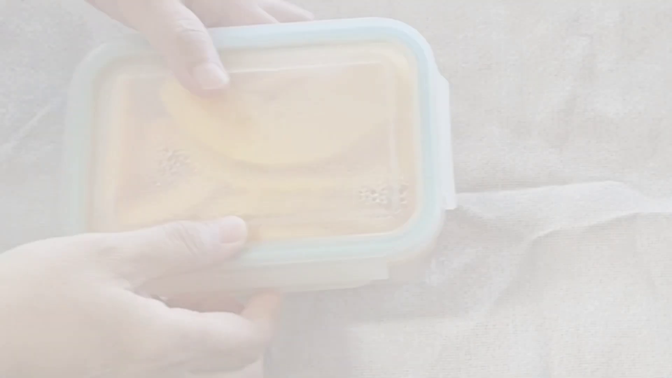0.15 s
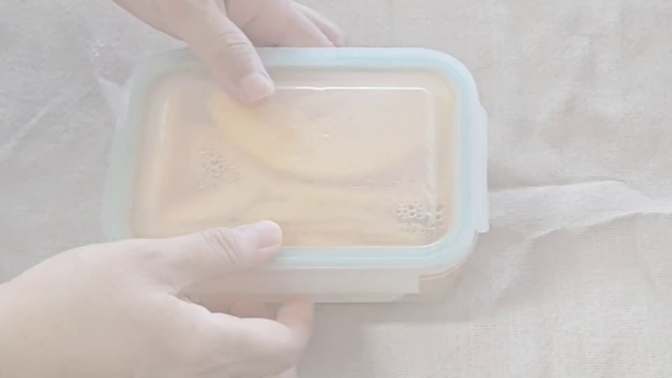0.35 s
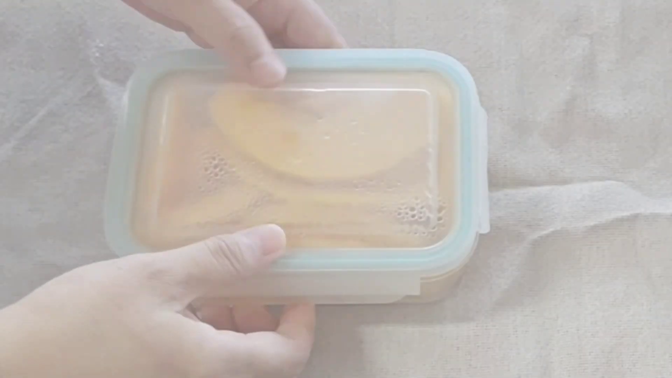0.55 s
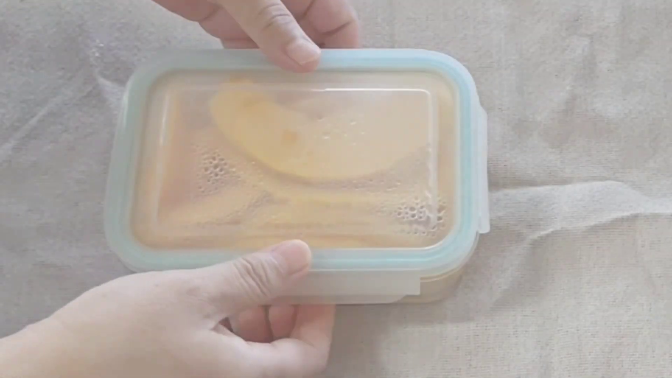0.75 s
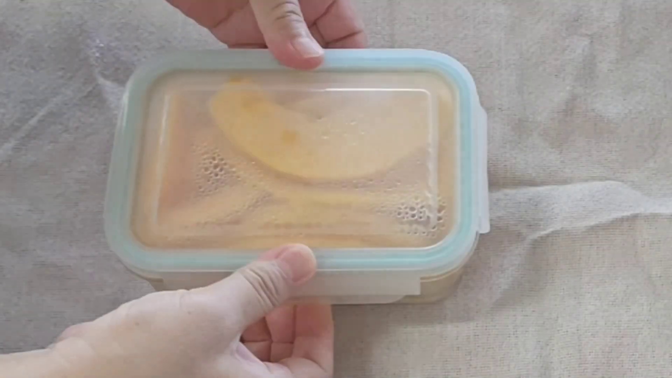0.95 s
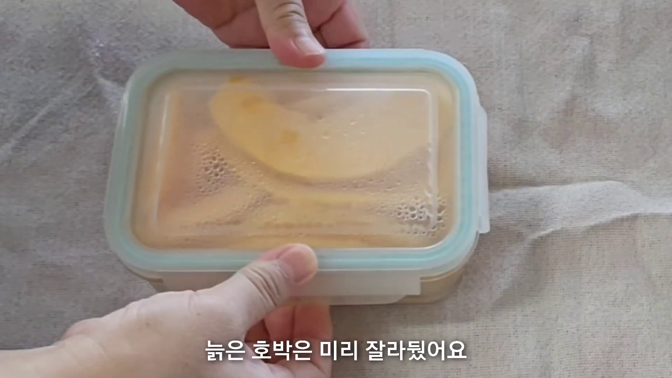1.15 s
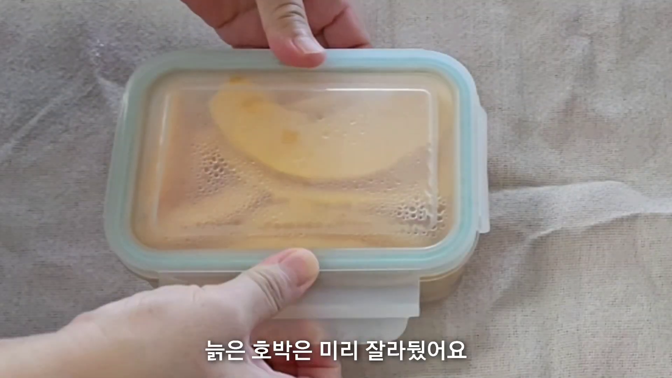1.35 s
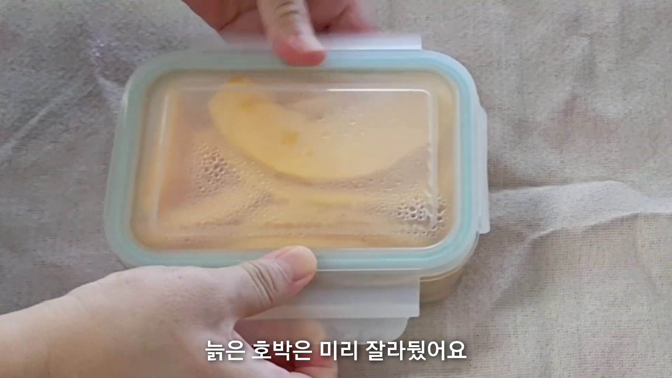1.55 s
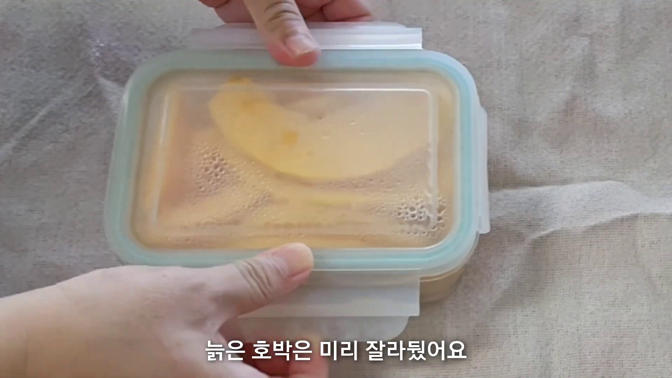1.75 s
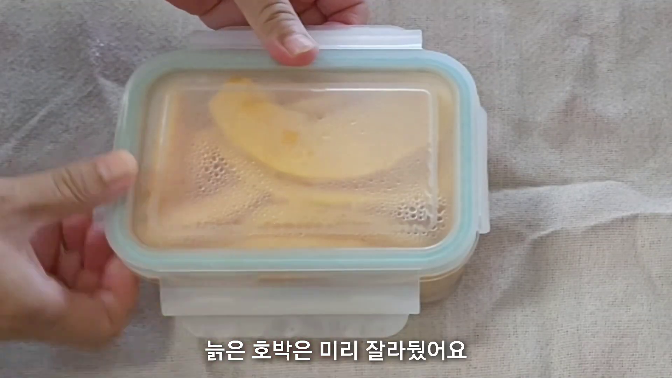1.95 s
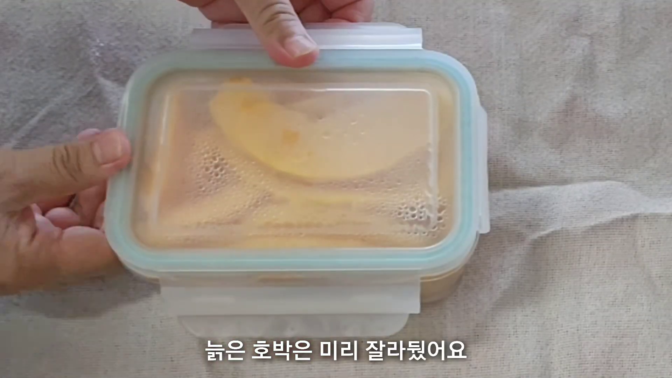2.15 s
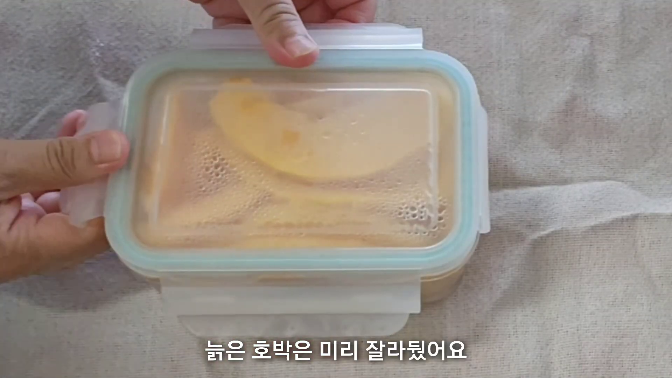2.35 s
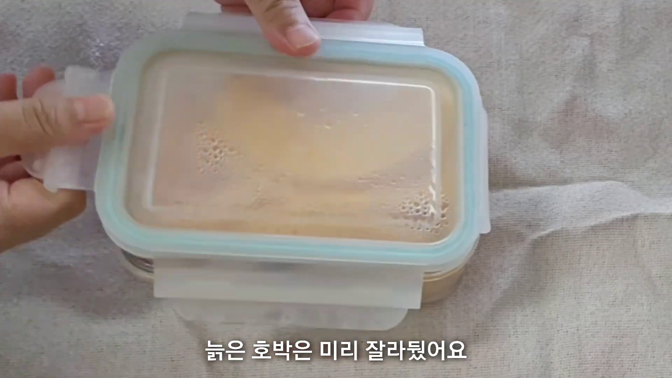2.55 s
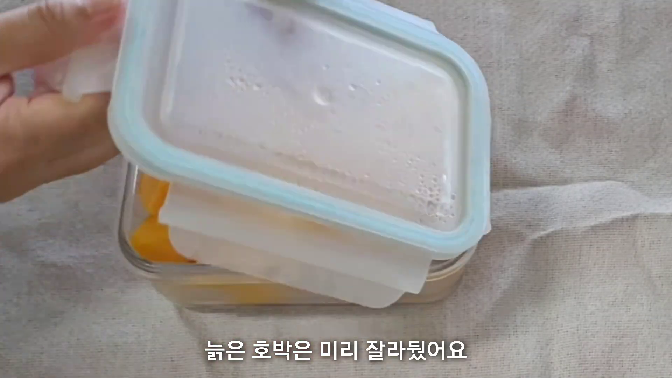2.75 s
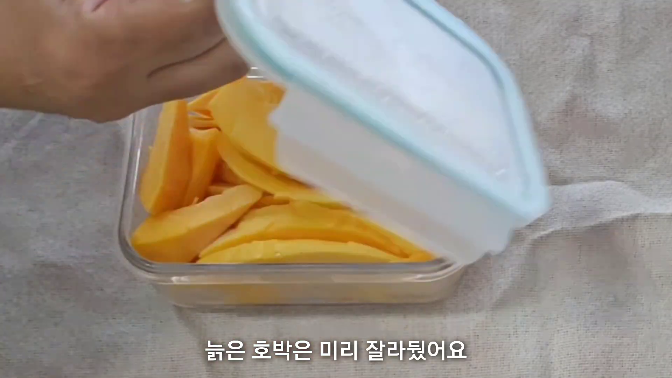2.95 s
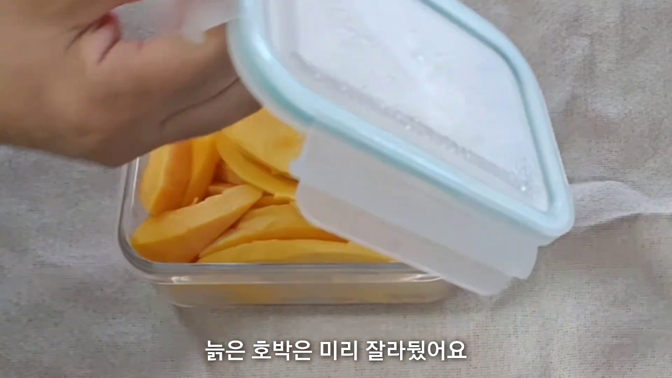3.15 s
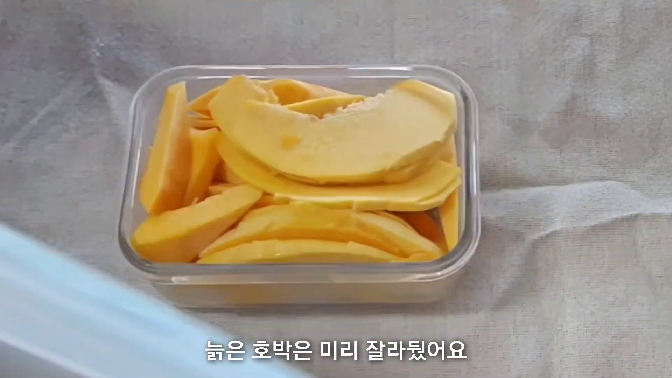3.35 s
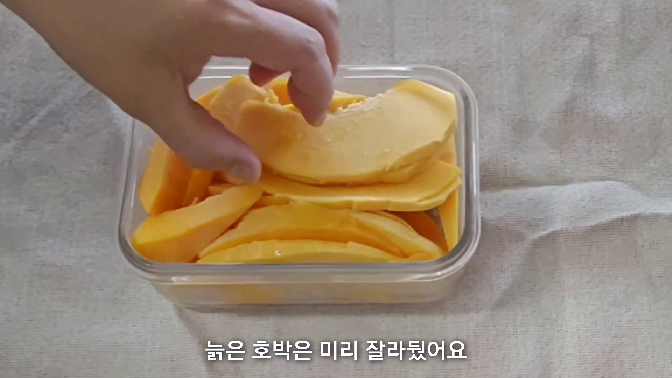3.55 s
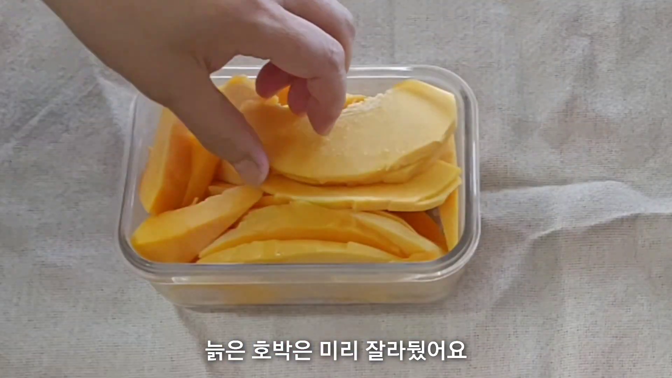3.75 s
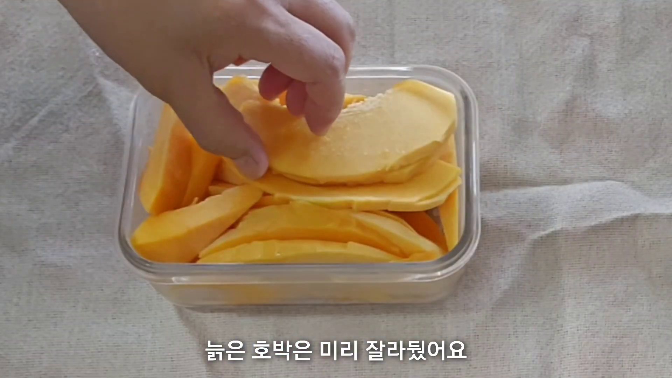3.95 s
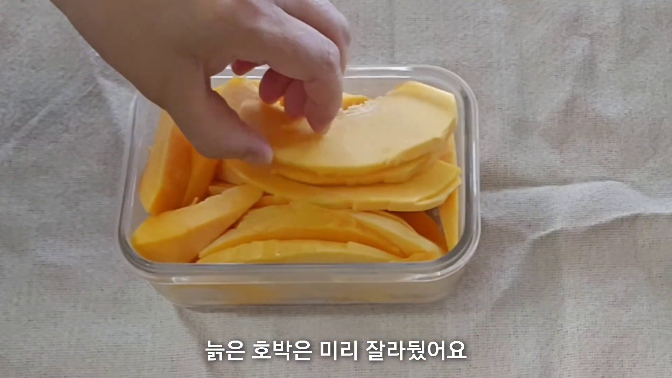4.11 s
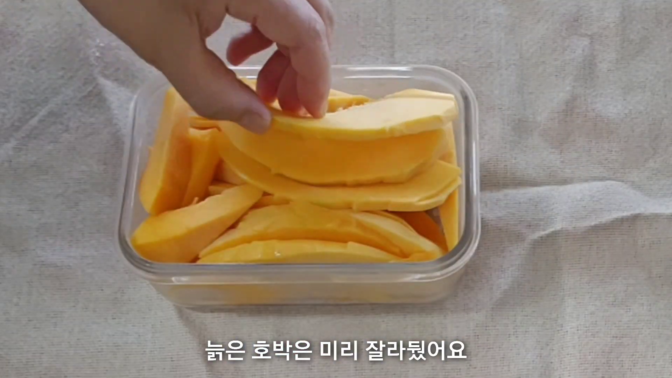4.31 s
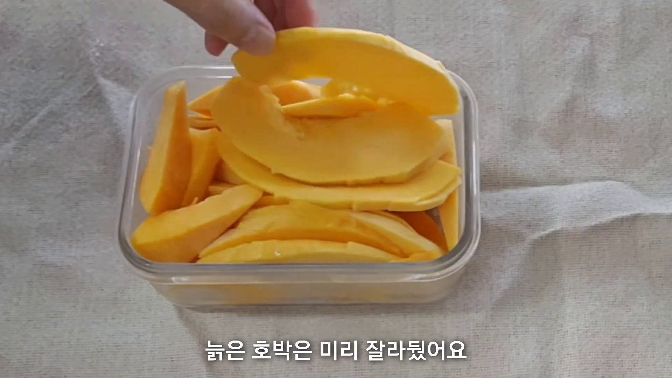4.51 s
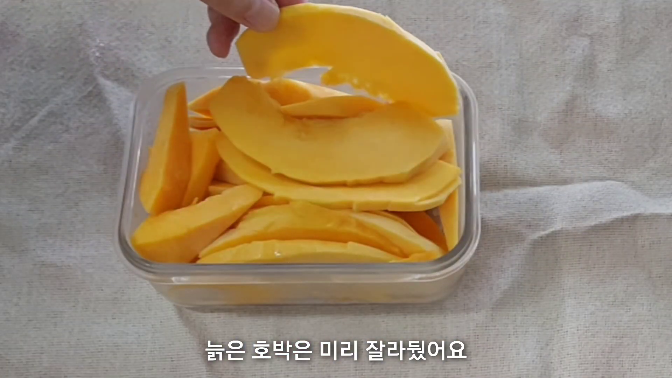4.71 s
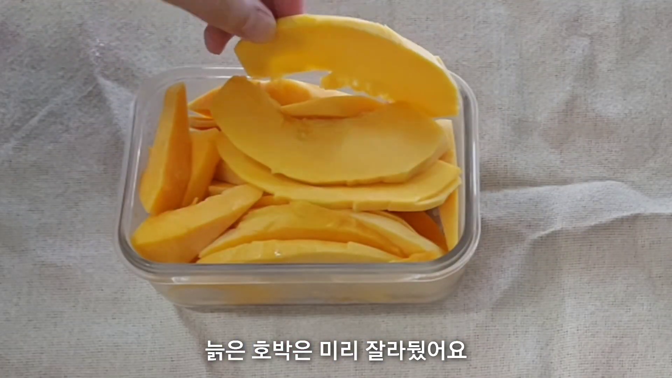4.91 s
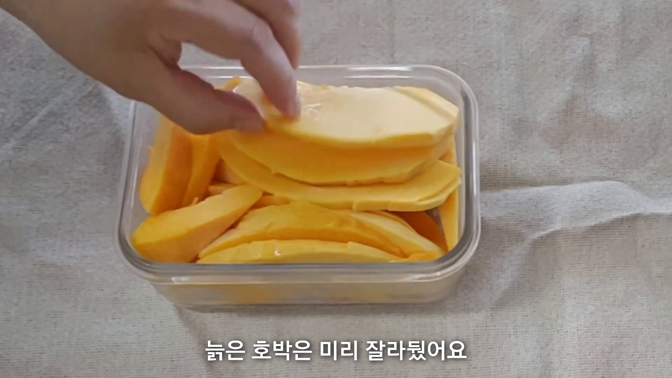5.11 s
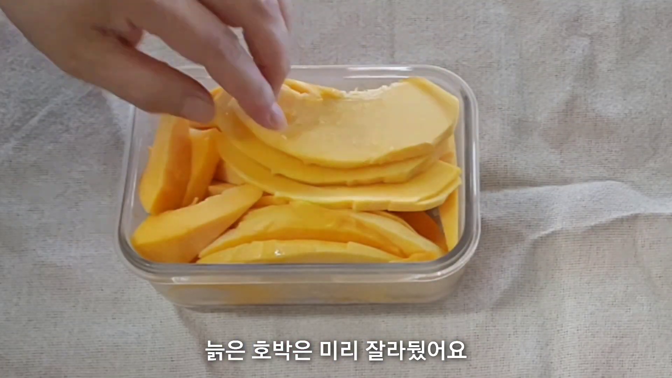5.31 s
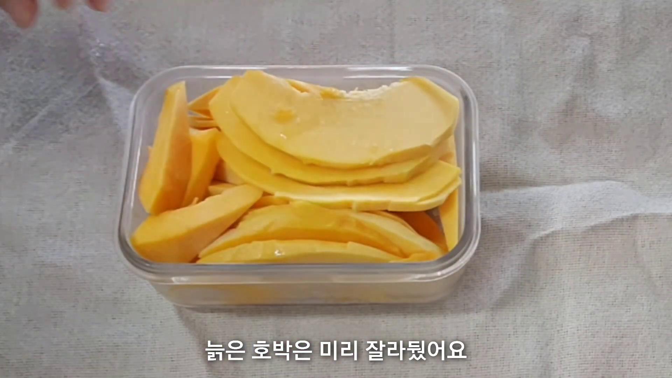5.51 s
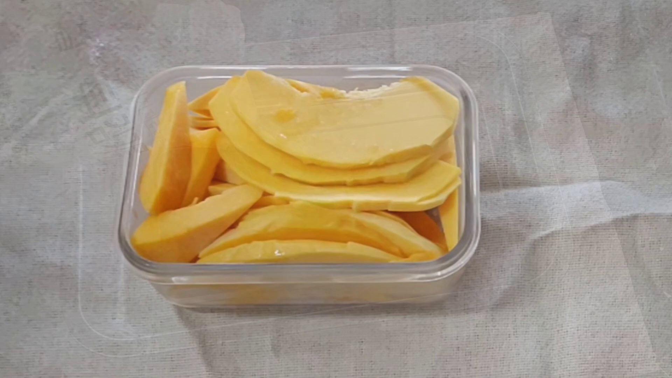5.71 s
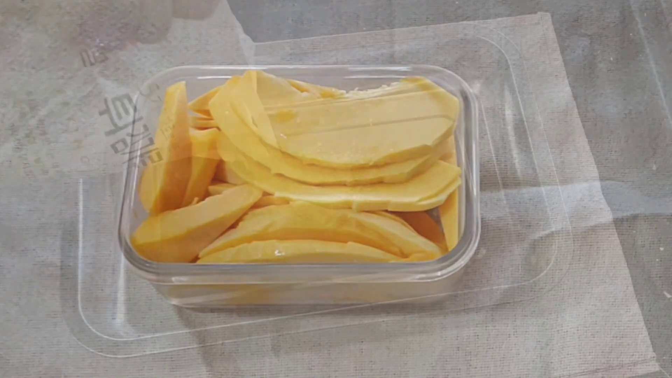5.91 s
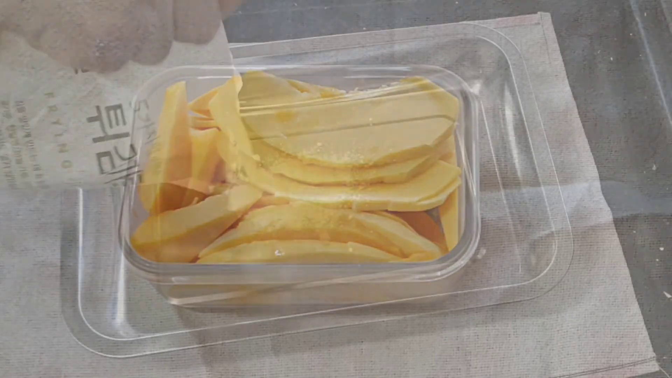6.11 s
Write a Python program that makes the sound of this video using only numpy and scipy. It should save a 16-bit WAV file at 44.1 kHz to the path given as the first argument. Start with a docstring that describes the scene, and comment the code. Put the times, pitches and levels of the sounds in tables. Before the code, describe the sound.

Close and dry over a low, faint room hum: a muffled glass thud, then three spaced latch snaps, the first by far the loudest and the others clicking with a little chatter. The lid comes away with faint scrapes and a small glassy tick. Soft finger touches are barely heard for a couple of seconds, until a flimsy plastic tray pops and rustles in a small kitchen.

```python
"""A glass dish is set down on a cloth, its plastic latches are snapped open and the lid is lifted off.
Fingers shift damp slices of squash; at the end a thin plastic tray crackles closer by.
Contacts are a slip, a click and chatter, driving ringing modes and a broad crack; soft hiss and rubbing,
rustling and the quiet kitchen hum are banded noise. Narrow resonances of noise let the glass sing, and
the kitchen answers each contact with a short tail of decaying noise."""
import sys
import numpy as np
from scipy import signal
from scipy.fft import rfft, irfft
from scipy.io import wavfile

SR = 44100
rng = np.random.default_rng(int(sys.argv[2]) if len(sys.argv) > 2 else 0)


def unload_wav(signal):
    """Save mono or channel-first audio to the path in sys.argv[1] as 16-bit WAV at rate SR, clipped to [-1, 1]."""
    wavfile.write(
        sys.argv[1],
        SR,
        np.round(np.clip(np.atleast_2d(signal).T, -1, 1) * 32767).astype(np.int16),
    )


N = 272097

BAND_EDGES_HZ = 20 * 2 ** np.arange(0, 10, .5)      # half octaves

# Ringing modes of dish, lid and table top.
# Each row: frequency in Hz, relative level in dB, time to fall by 60 dB in seconds.
DISH_MODES = [(50, -4.5, .12), (111.5, -3.5, 0.13), (176, -9, 0.02), (250, -4, 0.27), (339, 2.5, .07),
              (475, -8, 0.075), (558, -0.5, 0.067), (755, -11, .05), (1071, -2.5, 0.054), (1243, -6, 0.033),
              (1510, -3.5, 0.025), (1522.6, -5, 0.044), (1957, -3.5, 0.018), (2115, -8.5, 0.11),
              (2830, -5, 0.0067), (3030, -11, 0.034), (3530, -10.5, 0.024), (4410, -12, 0.034),
              (5520, -6, 0.016)]


def dish_blows():
    """Blows on dish and lid excite the modes of glass and table top, each with its own colour and chatter."""
    # Each row: start of the slip in seconds, level in dB, where it rings most in Hz, thud and tick in dB
    # against that ringing, fall above the tick in dB per octave, left minus right in dB,
    # decay constant of the chatter in seconds, chatter level in dB, extra sent to the room in dB.
    blows = [(0.497, -41, 545, 1, -63, 17, 1.5, .006, -15, 7.5),
             (0.535, -23, 1065, -8, -54, 22, 5, 0.0056, -26, -9.5),
             (0.539, -24, 720, -10.5, -55, 38, -0.5, .006, -7, 3.5),
             (1.52, -8.5, 1500, -37, -17, 10, 7, .009, -19.5, -7),
             (1.757, -22.5, 1500, -14.5, -3.5, 6, 1.7, 0.0039, -9.5, 2),
             (1.764, -27, 324, -31, -3, 7, 2.5, 0.024, -19, -4.5),
             (1.768, -38.5, 636, -5.5, -4, 12, 6, .012, -14, 0),
             (2.421, -25, 1125, -3.5, -13.5, -1, 3.5, 0.0061, -10.5, -4),
             (2.434, -36, 370, -10, -14.5, -2, -7.5, 0.0037, -6, -4.5),
             (2.445, -45, 350, 5.5, -11, 21.5, 2.1, .005, -3, -13),
             (2.62, -42.5, 1000, -22, -5.5, 23, 4, 0.0031, -1, 3.5),
             (2.631, -49, 564, -11, -6, 20, 3, 0.0092, -0.5, -12),
             (2.675, -44, 363, -26, -14, 18, 2, 0.0086, -18, 0),
             (2.69, -49, 680, -18, -5, 11, -1, 0.0077, -13, -12),
             (2.705, -61.5, 350, -17, -5, 19, 2.1, .0061, -5, 0),
             (2.845, -46.5, 540, -14.5, -15, 42, 2.5, 0.0054, -6.5, 1),
             (3.124, -53, 1220, -20.5, -3, 10, 5.5, 0.0094, -3.5, 2.5),
             (3.132, -43.5, 1620, -50, 12.5, 7, -0.5, 0.0078, -7, 4)]
    slopes = dict(thud_hz=200, below_db=23.5, above_db=16.5)
    return struck(blows, DISH_MODES, ring_db=-5.5, crack_db=7.5, spread_db=5.5, room_db=14.5, slopes=slopes)


def finger_ticks():
    """Fingers on lid and slices tick faintly, exciting the dish modes less than the blows do."""
    # Each row: start of the slip in seconds, level in dB, where it rings most in Hz,
    # tick in dB against that ringing, left minus right in dB.
    ticks = [(0.1472, -68, 503, 9, -2), (0.2548, -82, 410, 23, -2.1), (0.728, -59, 1250, -5, 2),
             (0.853, -62, 1800, 12.5, 4.5), (0.9133, -60, 690, -7, 13), (1.043, -76, 1300, 10, 9.5),
             (1.9659, -53, 1200, -6, 6), (3.3599, -73.5, 1803, 8, 10), (4.3074, -65, 2000, 14, 6.5),
             (5.3733, -58.5, 1373, -22, 8.5)]
    thud_db, fall_db_per_oct, chatter_s, chatter_db = -16, 3, 0.0063, -7
    events = [(s, db, ring_hz, thud_db, tick_db, fall_db_per_oct, pan_db, chatter_s, chatter_db, 0)
              for s, db, ring_hz, tick_db, pan_db in ticks]
    slopes = dict(thud_hz=198, below_db=12.5, above_db=19.5)
    return struck(events, DISH_MODES, ring_db=-12, crack_db=5.1, spread_db=7.0, room_db=24.0, slopes=slopes)


def tray_crackles():
    """The thin tray buckles in snaps that excite its own modes."""
    # Each row: start of the slip in seconds, level in dB, where it rings most in Hz,
    # thud and tick in dB against that ringing.
    crackles = [(5.724, -42.5, 950, -34, -14), (5.732, -31, 1400, -7.5, -12), (5.775, -40.5, 1310, -13, 7),
                (5.8, -41, 810, -3, -37), (5.818, -40, 750, -20, -36), (5.866, -36, 1200, -4.5, -45),
                (5.88, -50.5, 863, 1, 6), (5.903, -38.5, 1300, -19, -41), (5.959, -50, 1200, -22, -9),
                (5.973, -37, 1280, -17, -3), (5.983, -45.5, 1970, -12, 21.5), (6.017, -48, 1280, -5, -10),
                (6.081, -35.5, 1440, -51, -28), (6.093, -35.5, 1305, -45, 0.5),
                (6.161, -28.5, 920, -24, -13)]
    # Ringing modes of the tray.
    # Each row: frequency in Hz, relative level in dB, time to fall by 60 dB in seconds.
    tray_modes = [(500, -8, 0.079), (930, 1.5, 0.012), (1055, -12, 0.09), (1310, -5, 0.036),
                  (1480, -15, 0.06), (1990, -5.5, 0.017), (3200, -14, 0.017)]
    fall_db_per_oct, pan_db, chatter_s, chatter_db = 8, 1.1, .005, -5
    events = [(*row, fall_db_per_oct, pan_db, chatter_s, chatter_db, 0) for row in crackles]
    slopes = dict(thud_hz=302, below_db=17.5, above_db=19)
    return struck(events, tray_modes, ring_db=-2.5, crack_db=-5.1, spread_db=5.5, room_db=8.0, slopes=slopes)


def struck(events, modes, ring_db, crack_db, spread_db, room_db, slopes):
    """Each contact is a slip, a click and dying chatter: a broad crack plus every mode, coloured by where
    it lands. Rows returned: left, right, and what spreads into the room."""
    slip_s = .0015      # the contact grows with this time constant before it lets go
    out = np.zeros((3, N + SR))
    t = np.arange(8192) / SR
    hz, mode_db, t60 = np.transpose(modes)[:, :, None]
    grid = np.maximum(np.arange(4097) * SR / 8192, 30)
    per_octave_db = 20 * np.log10(SR / 2 / grid)      # equal peak from every octave
    lead = SR // 100      # samples kept ahead of the click
    near = t[:SR // 16] - lead / SR      # time from the click
    for s, level_db, *landing, pan_db, chatter_s, chatter_db, far_db in events:
        # the body: modes and crack
        held_hz = hz * (1 + .015 * rng.standard_normal(hz.shape))      # the grip detunes the modes
        rings = np.sin(2 * np.pi * held_hz * t) * from_db(-60 * t / np.maximum(t60, .003))
        rings_db = mode_db + ring_db + colour(hz, *landing, **slopes)
        rings_db = rings_db + spread_db * rng.standard_normal(hz.shape)
        grid_db = colour(grid, *landing, **slopes)
        crack = pulse(crack_db + per_octave_db + grid_db)
        body = np.sum(from_db(rings_db) * rings, axis=0) + crack
        # the contact that drives it
        grain = from_db(1.0 * rng.standard_normal(len(near)) - 13)
        mid, side = rng.standard_normal((2, len(near))) * grain
        shape = np.exp(np.minimum(near / slip_s, -near / max(chatter_s, 3e-4)))
        contact = from_db(chatter_db) * wide(mid, 0.86 * side) * shape
        # light touches do not move the heavy low modes
        contact = signal.lfilter([1, -1], [1, -.93], contact)
        contact[:, lead] = -1      # the click
        sound = signal.fftconvolve(contact, body[None], axes=1) * panned(pan_db) * from_db(level_db)
        click_at = round((s + slip_s) * SR)
        at = click_at - lead
        out[:2, at:at + sound.shape[1]] += sound
        # all directions together: an evener colour
        spread = pulse(level_db + room_db + far_db + per_octave_db + 0.49 * grid_db)
        out[2, click_at:click_at + len(spread)] += spread
    return out[:, :N]


def colour(hz, ring_hz, thud_db, tick_db, top_db, thud_hz, below_db, above_db):
    """Share in dB that a contact gives each pitch: low thud, ringing region, hard tick (dB per octave slopes)."""
    def hill(top_hz, rise_db, fall_db):
        octaves = np.log2(hz / top_hz)
        return np.minimum(rise_db * octaves, -fall_db * octaves)

    thud = thud_db + hill(thud_hz, 3.0, above_db)
    ringing = hill(ring_hz, below_db, above_db)
    tick = tick_db + hill(4000, 13.5, top_db)
    return 20 * np.log10(np.sum(from_db([thud, ringing, tick]), axis=0))


def hiss_and_rubbing():
    """Banded noise: a steady quiet hiss, soft rubbing swells, and noisy tails after some blows."""
    # Each row: start in seconds, rise in seconds, hold in seconds, level in dB, fade in dB per second.
    swells = [(0, 0.0057, 3.44, -82, 48), (0.142, 0.12, 0.37, -76, 36), (0.534, 0.021, .01, -91, 87),
              (2.62, 0.049, .01, -78, 300), (3.108, 0.03, 0.026, -65, 61.5),
              (3.918, 0.0028, 0.017, -66.5, 105)]
    # Each row: frequency in Hz, relative density in dB per Hz.
    noise_spectrum = [(710, -18.5), (1200, -14.5), (1410, -9), (1520, -1.5), (4110, -3.5), (5150, -7),
                      (9570, -21.5), (11400, -17), (15500, -24)]
    return swelling(swells) * banded_noise(noise_spectrum, patchy_db=1.7, grain_db=1.0)


def glass_singing():
    """Trembling of the dish, heard only through the narrow resonances of its glass walls."""
    # Each row: start in seconds, rise in seconds, hold in seconds, level in dB, fade in dB per second.
    swells = [(.545, 0.012, 0.079, -67.5, 200), (1.765, .02, 0.072, -60.5, 86),
              (2.43, 0.025, 0.022, -75, 150), (3.14, 0.0092, .02, -63.5, 121)]
    # Resonances of the walls. Each row: frequency in Hz, width in Hz, relative level in dB.
    walls = [(3125, 40, 11.5), (3400, 55, 8), (4130, 50, 8.5), (5080, 76, 3), (5158, 17, 5.5),
             (5390, 40, 7), (6060, 12, 6.5), (6000, 45, -0.5)]
    trembling = wide(*rng.standard_normal((2, N)) * [[1], [.6]])
    ringing = 0
    for hz, width_hz, db in walls:
        resonance = peaked(trembling, hz, width_hz, 6) - trembling      # the resonance alone
        ringing = ringing + from_db(db) * resonance
    return swelling(swells) * rms_one(ringing)


def tray_rustling():
    """The tray slides and rustles: coarse-grained banded noise along a level curve."""
    # Each row: time in seconds, level in dB.
    level_curve = [(5.688, -55), (5.74, -55.5), (5.99, -55), (6.05, -55), (6.17, -55.5)]
    # Each row: frequency in Hz, relative density in dB per Hz.
    rustle_spectrum = [(88, -28), (150, -8), (244, 1.5), (390, -35), (512, -8.5), (974, -9), (1280, -14),
                       (1710, -16), (3390, -25), (15800, -41)]
    return in_time(level_curve) * banded_noise(rustle_spectrum, patchy_db=.6, grain_db=3.5)


def room_hum():
    """Quiet room tone: mostly low banded noise along a level curve."""
    # Each row: time in seconds, level in dB.
    level_curve = [(0.0, -58), (2.75, -58.5), (2.87, -60), (5.67, -60.5), (5.91, -56), (6.17, -55.5)]
    # Each row: frequency in Hz, relative density in dB per Hz.
    hum_spectrum = [(12, -32), (20, -1), (61, -0.5), (163, -19.5), (240, -11), (398, -22.5), (470, -12.5),
                    (676, -31), (1060, -30.5), (1150, -29), (2660, -41), (4520, -43.5), (9350, -59.5),
                    (11400, -58), (15900, -51.5)]
    return in_time(level_curve) * banded_noise(hum_spectrum, patchy_db=.6, grain_db=1.4)


def kitchen_tail(x):
    """Reflections build up over a few ms and die band by band."""
    # Each row: frequency in Hz, relative level in dB, time to fall by 60 dB in seconds.
    reflections = [(60, -33.5, .4), (251, -29.5, 0.58), (900, -18, 0.15), (1600, -31.5, 0.5),
                   (3140, -23.5, 0.16), (5340, -33, .6), (7440, -34.5, .35), (14000, -21.5, 0.13)]
    t = np.arange(int(.7 * SR)) / SR
    tail = 0
    for hz, noise in bands(rng.standard_normal((2, 2, len(t)))):
        t60 = max(at_hz(reflections, hz, axis=2), .05)
        tail = tail + noise * from_db(at_hz(reflections, hz) - 20 - 60 * t / t60)
    mid, side = tail * (1 - np.exp(-t / .006))
    return signal.fftconvolve(x[None], wide(mid, 0.77 * side), axes=1)[:, :N]


def tail_colour(x):
    """Colour of the room tail: broad resonances in series, for all contacts."""
    # Each row: frequency in Hz, width in Hz, boost in dB.
    resonances = [(3250, 350, 8), (4400, 300, 4), (5450, 600, 9)]
    for hz, width_hz, db in resonances:
        x = peaked(x, hz, width_hz, db)
    return x


def banded_noise(spectrum, patchy_db, grain_db):
    """Stereo noise with a level and likeness per band; one slow drift moves all bands, grain makes it gritty."""
    # Each row: frequency in Hz, left-right likeness (1 alike, 0 unrelated; clipped to that range).
    likeness = [(60, 1), (180, 1.83), (550, -1), (1650, 0.02), (4970, -0.01), (15000, -3.6)]
    out, together = 0, drift(0.89)
    white = rng.standard_normal((2, 2, N)) * from_db(grain_db * rng.standard_normal(N))
    for hz, (mid, side) in bands(white):
        alike = np.clip(at_hz(likeness, hz), 0, 1)
        gain = from_db(at_hz(spectrum, hz) + patchy_db * together)
        out = out + gain * (np.sqrt(1 + alike) * mid + np.sqrt(1 - alike) * side * [[1], [-1]])
    return rms_one(out)


def bands(white):
    """Half-octave slices of two-row noise with their centres in Hz; neighbours are unrelated."""
    for k, (low, high) in enumerate(zip(BAND_EDGES_HZ, BAND_EDGES_HZ[1:])):
        band_pass = signal.butter(2, [low, high], "band", fs=SR, output="sos")
        yield np.sqrt(low * high), signal.sosfilt(band_pass, white[k % 2])


def drift(rate_hz):
    """Slow random wander of unit rms: noise through two equal low-pass poles, at one step per 40 samples."""
    r = np.exp(-80 * np.pi * rate_hz / SR)
    noise = rng.standard_normal(N // 40 + 2002)
    slow = signal.lfilter([1], [1, -2 * r, r * r], noise)[2000:]      # settled part only
    return np.interp(np.arange(N) / 40, np.arange(len(slow)), rms_one(slow))


def swelling(swells):
    """Gain along a run of swells: each rises, holds and fades."""
    t = np.arange(N) / SR
    gain = 0
    for s, rise, hold, db, fade in swells:
        onset = np.clip((t - s) / max(rise, 1e-3), 0, 1) ** 2
        gain = gain + onset * from_db(db - fade * np.maximum(t - s - rise - hold, 0))
    return gain


def peaked(x, hz, width_hz, db):
    """The sound with one resonance boosted by a two-pole band-pass."""
    r, w = np.exp(-np.pi * width_hz / SR), 2 * np.pi * hz / SR
    zeros = (1 - r * r) / 2 * np.array([1, 0, -1])
    resonance = signal.lfilter(zeros, [1, -2 * r * np.cos(w), r * r], x)
    return x + (from_db(db) - 1) * resonance


def pulse(db):
    """The shortest causal pulse with this spectrum (folded cepstrum)."""
    cepstrum = irfft(np.log(from_db(db)))
    cepstrum[1:len(db) - 1] *= 2
    cepstrum[len(db):] = 0
    return irfft(np.exp(rfft(cepstrum)))


def wide(mid, side):
    """Left and right; close microphone ports differ mainly in the treble."""
    side = signal.lfilter([1, -1], [1, -.85], side)
    return np.array([mid + side, mid - side])


def panned(db):
    """Left and right gains for a level difference."""
    return from_db([[db / 2], [-db / 2]])


def in_time(rows):
    """Gain along a curve of seconds and dB, silent outside it."""
    s, db = np.transpose(rows)
    return from_db(np.interp(np.arange(N) / SR, s, db, left=-200, right=-200))


def at_hz(points, hz, axis=1):
    """A column of a frequency table, read on a log axis."""
    points = np.array(points)
    return np.interp(np.log(hz), np.log(points[:, 0]), points[:, axis])


def from_db(db):
    """Gain of a level in dB."""
    return 10 ** (np.asarray(db) / 20)


def rms_one(x):
    """Scaled to unit rms."""
    return x / np.sqrt(np.mean(x ** 2) + 1e-20)


def scene():
    """Dish, fingers and tray in the kitchen, over hiss and rubbing, singing glass, rustling and room tone."""
    hits = dish_blows() + finger_ticks() + tray_crackles()
    # the hits carry no deep bass below about 60 Hz
    hits = signal.sosfilt(signal.butter(2, 60, "high", fs=SR, output="sos"), hits)
    tail = kitchen_tail(tail_colour(hits[2]))
    beds = hiss_and_rubbing() + glass_singing() + tray_rustling() + room_hum()
    return hits[:2] + tail + beds * panned(1.97)      # the beds lean left


def record(dry):
    """The microphone ports ring in the treble, the highest peaks are rounded, the top is cut."""
    ported = peaked(dry, hz=11370, width_hz=310, db=6.5)
    rounded = ported / (1 + np.abs(ported / .95) ** 6) ** (1 / 6)
    top_cut = signal.cheby2(12, 60, 16500, fs=SR, output="sos")      # 60 dB down from 16.5 kHz upwards
    return signal.sosfilt(top_cut, rounded)


dry = scene()
out = record(dry)
unload_wav(out)
```